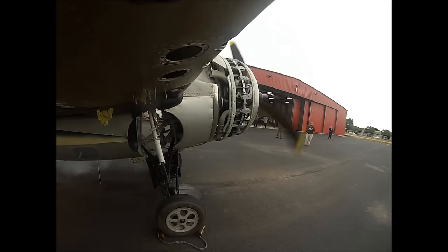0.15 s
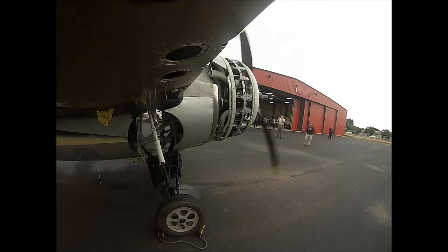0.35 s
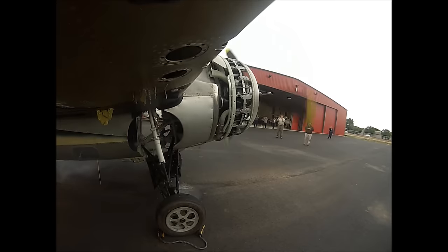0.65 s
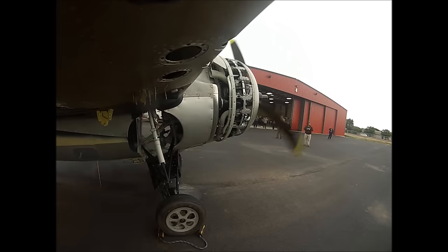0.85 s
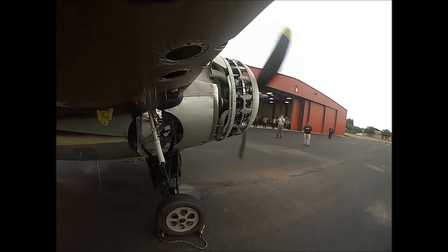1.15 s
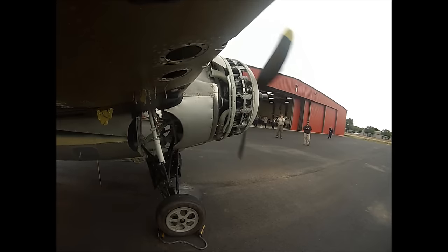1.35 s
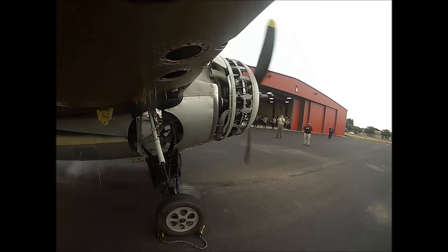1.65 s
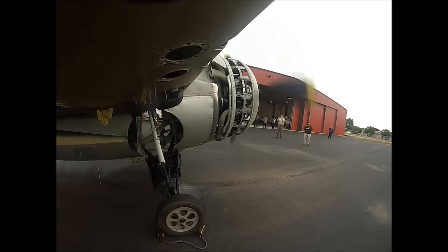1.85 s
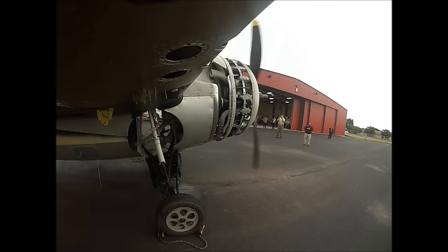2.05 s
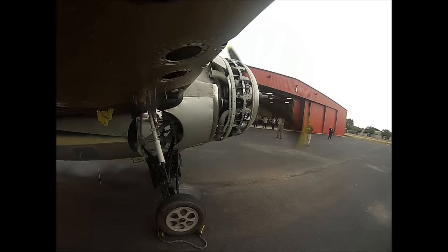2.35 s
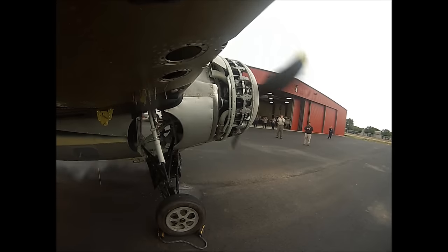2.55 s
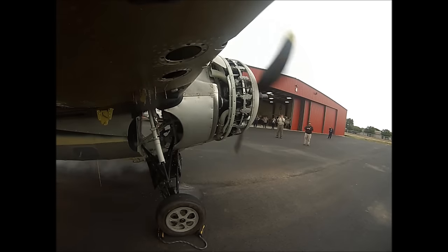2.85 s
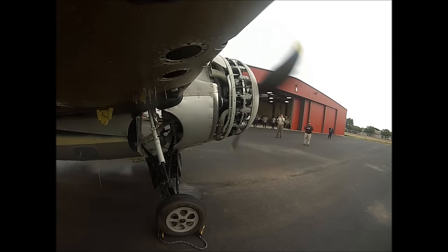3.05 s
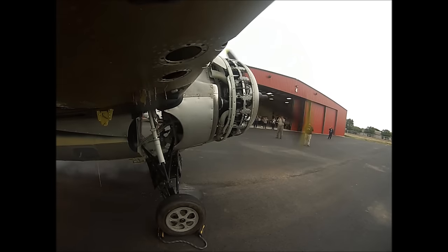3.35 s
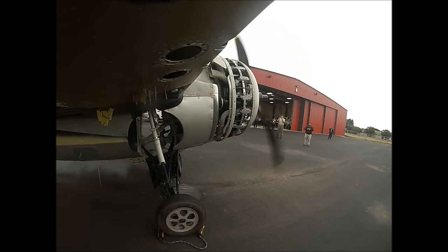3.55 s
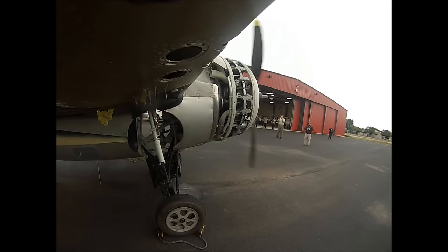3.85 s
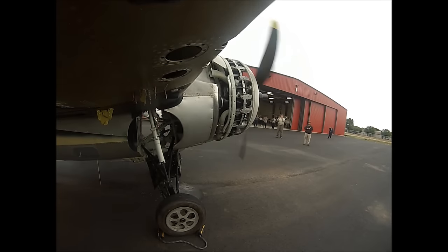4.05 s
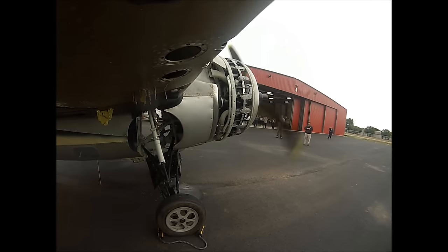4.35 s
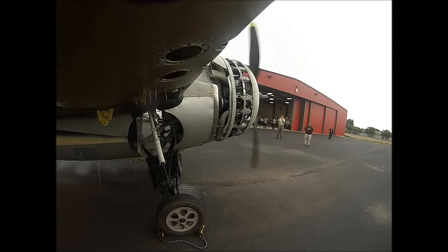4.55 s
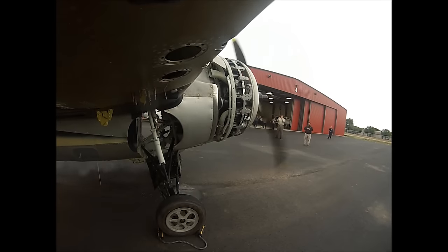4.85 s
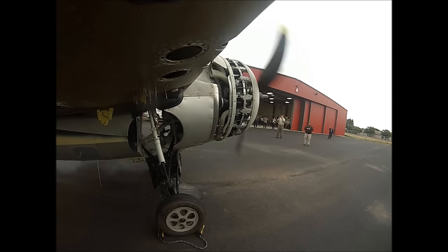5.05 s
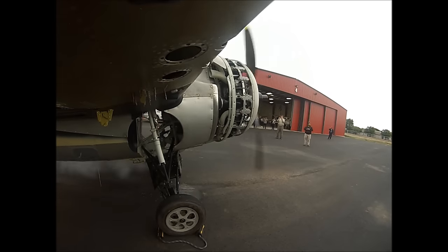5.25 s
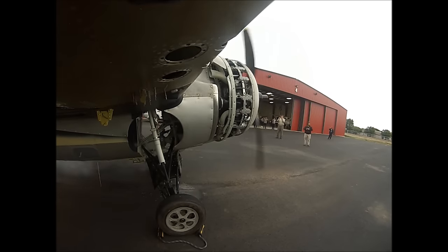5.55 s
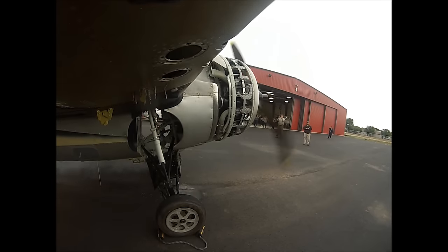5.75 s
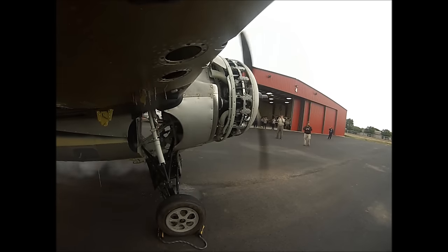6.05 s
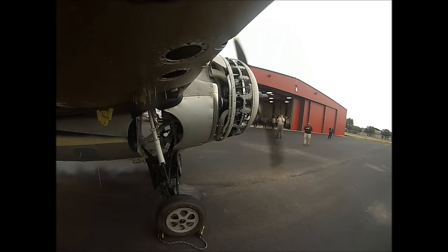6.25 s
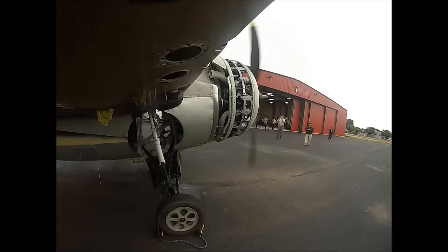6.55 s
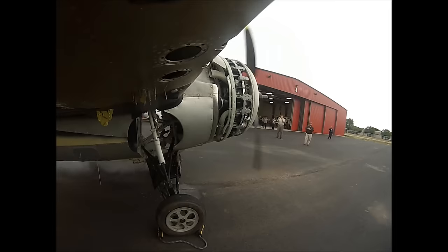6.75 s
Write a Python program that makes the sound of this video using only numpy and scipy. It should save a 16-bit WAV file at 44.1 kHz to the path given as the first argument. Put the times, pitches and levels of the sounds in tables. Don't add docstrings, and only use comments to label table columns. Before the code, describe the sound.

A large radial aircraft engine is already running roughly at 0 seconds, heard close under the wing on an open ramp through a small housed microphone. Uneven exhaust puffs come in a limping pattern, roughly twenty a second, each a short bright hiss or whistle followed by a hollow metallic ring; some knock dully. Hard cracks snap near 0.5 and 0.7, and misfires leave holes until about 1.4. Around 1.75 a crack and heavy suction bangs land together, and richer, louder popping with more metallic clatter follows through 2.6. More cracks and thumps hit near 3.0, 3.25, 4.2, 4.6 and 4.75. Afterward puffs weaken gradually but stay irregular, continuing to the cut near 6.9. Underneath run swelling panel booms, a wavering deep throb, valve ticking and low propeller rumble. Close, dry and open-air, without noticeable echo.

```python
import sys
import numpy as np
from scipy import signal
from scipy.fft import rfft, irfft
from scipy.io import wavfile
from scipy.ndimage import uniform_filter1d

SR = 44100
rng = np.random.default_rng(int(sys.argv[2]) if len(sys.argv) > 2 else 0)


def volts_from_db(level):
    exponent = np.asarray(level, float) / 20
    return 10 ** exponent


def unload_wav(signal):
    wavfile.write(
        sys.argv[1],
        SR,
        np.round(np.clip(np.atleast_2d(signal).T, -1, 1) * 32767).astype(np.int16),
    )


N = 303849


def rms_one(x):
    return x / np.sqrt(np.mean(x ** 2) + 1e-20)


def in_time(rows):
    s, values = np.transpose(rows)
    return np.interp(np.arange(N) / SR, s, values)


def band(x, low_hz, high_hz):
    return signal.sosfilt(signal.butter(2, [low_hz, high_hz], "band", fs=SR, output="sos"), x + 1e-18)


def coloured(spectrum, white):
    hz, db = np.transpose(spectrum)
    log_hz = np.log(np.arange(N // 2 + 1) * SR / N + 1)
    gain = volts_from_db(np.interp(log_hz, np.log(hz), db, -90, -90))
    return irfft(rfft(white) * rms_one(gain), N)


def resonate(x, modes, wander_db=0.):
    out = 0
    for k, (hz, width_hz, db) in enumerate(modes):
        r = np.exp(-np.pi * width_hz / SR)
        wander = np.interp(np.arange(N), np.linspace(0, N, 200), rng.standard_normal(200))
        drive = x * volts_from_db(wander_db * wander) + 1e-18
        ring = signal.lfilter([1, 0, -1], [1, -2 * r * np.cos(2 * np.pi * hz / SR), r * r], drive)
        out = out + (-1) ** k * volts_from_db(db) * (1 - r * r) / 2 * ring
    return out


def evened(x, span_s, share):
    x = rms_one(x)
    power = uniform_filter1d(x * x, int(span_s * SR))
    return x / (power + 0.036) ** (share / 2)


def turbulence(grit_db, cut_hz):
    lowpass = signal.butter(2, cut_hz, fs=SR, output="sos")
    flutter = rms_one(signal.sosfilt(lowpass, rng.standard_normal(N)))
    return rms_one(rng.standard_normal(N) * volts_from_db(grit_db * flutter))


def grains(per_s, spread_db):
    sizes = volts_from_db(spread_db * np.minimum(rng.exponential(1, N), 4))
    signs = rng.choice([-1, 1], N)
    return rms_one(sizes * signs * (rng.random(N) < per_s / SR))


CYCLE_STARTS_S = [-0.044, .2095, .457, 1.231, 1.755, 2.198, 2.413, 2.826, 3.025, 3.989, 4.365, 4.549,
                  4.7295, 4.909, 5.432, 6.104, 6.432, 6.93]
CYCLES_DONE = [0, 1, 2, 5, 7, 9, 10, 12, 13, 18, 20, 21, 22, 23, 26, 30, 32, 35]


def crank_angle(s):
    return np.interp(s, CYCLE_STARTS_S, CYCLES_DONE)


# place in the cycle 0-1, opening time in s, mouth in dB, whistle in dB, hum in dB.
STACKS = [
    (-.004, .005, -1, -2.5, -14.5),
    (.108, 0.0078, 0, -10.5, -14),
    (.372, .008, 2, -17, -1.5),
    (.545, 0.0057, -7, -5.5, -13.5),
    (.8, .009, -1, -2.5, -3),
]
# jet hiss in dB, upper housing ring in dB, lower housing ring in dB.
USUAL_PUFF = [
    (-29.5, -27, -23),
    (-30, -24, -22),
    (-44.5, -33, -34),
    (-33, -27, -26),
    (-57, -44, -40),
]
# time in s, then jet, upper ring and lower ring in dB.
SCATTER = [.0008, 1.2, 2.0, 2.5]
# time in s, strength in dB.
CHARGE = [(0, .5), (1.3, 1.1), (1.5, -3), (1.75, 3), (2.0, -2.2), (2.2, 1.1), (2.45, 2.5), (3.0, 1.1),
          (3.3, .1), (3.6, 1.5), (3.8, -1.1), (4.1, .4), (4.4, -3), (4.75, 1.1), (5.1, -3), (5.5, -2.5),
          (6.1, -5), (6.89, -6)]
# time in s, then gain of jet, upper ring and lower ring in dB.
RICH = [(.456, 2.5, 2.5, 1.5), (.485, .1, 2.5, 6), (.744, .1, 1.5, 3), (.809, 4, 2.5, 7),
        (.854, 2.5, -1.5, 2.5), (1.065, 3, 2.5, 6), (1.259, .1, -1.5, 3), (1.585, 4, 1.5, 9),
        (1.628, 1.5, 8, 4), (1.756, 2.5, 5, 2.5), (1.93, 5, 11, 11), (2.06, -1.5, 2.5, 8), (2.099, 4, 6, 9),
        (2.198, 2.5, 5, -3), (2.434, .6, -.6, 3), (2.623, .6, -.6, 3), (3.025, -1.5, 2.5, 5),
        (3.22, .1, -2.5, 4), (3.486, -.6, .6, 6), (3.605, .1, .1, 3), (3.624, 3, 1.5, 2.5),
        (4.093, -1.5, 1.5, 4), (4.386, -1.5, -4, 4), (4.649, 2.5, 1.5, 5), (5.001, 4, -.6, .6),
        (5.257, .6, -3, 5), (5.449, -3, -6, 3), (5.768, 4, -.6, -3), (5.936, -1.5, -3, 4),
        (6.192, 4, -.6, 6)]
# time in s, then loss of jet, upper ring and lower ring in dB.
LEAN = [(.094, 7, 5, 3), (.236, -.6, 2.5, 5), (.715, .6, 3, .6), (1.001, .6, 3, 4), (1.495, 1.5, 4, 7),
        (1.828, -1.5, -1.5, -1.5), (2.223, 4, -1.5, 6), (2.277, 2.5, -3, 6), (2.488, 1.5, 3, 10),
        (2.643, 5, -.6, 8), (2.899, -1.5, -2.5, 8), (3.045, -3, -1.5, 6), (3.131, 2.5, 2.5, 9),
        (3.295, 2.5, 2.5, 10), (3.415, 1.5, 4, .6), (3.436, 1.5, .6, 5), (3.515, 2.5, 5, 8),
        (3.682, -.6, 9, 14), (3.796, .1, -5, 18), (3.867, -1.5, -2.5, 8), (4.06, .6, -3, 9),
        (4.178, -.6, -3, 11), (4.433, -1.5, -4, 8), (4.464, 1.5, 7, 1.5), (4.549, .1, 3, 18),
        (4.825, 2.5, 5, 16), (5.274, 2.5, 4, 16), (5.62, 1.5, 1.5, 8), (6.433, 2.5, 14, 10),
        (6.615, -1.5, 7, 7)]
# time in s, loss in
# dB.
MISFIRES = [(-.015, 25), (.598, 25), (1.113, 25), (1.328, 14), (1.372, 16), (1.78, 25), (1.876, 22),
            (2.315, 22), (3.902, 22)]


def puffs():
    angle = (np.arange(CYCLES_DONE[-1])[:, None] + np.array(STACKS)[:, 0]).ravel()
    stack = np.arange(len(angle)) % len(STACKS)
    chance = rng.standard_normal((len(angle), 4)) * SCATTER
    s = np.interp(angle, CYCLES_DONE, CYCLE_STARTS_S) + chance[:, 0]
    charge_db = np.interp(s, *np.transpose(CHARGE))
    follows = [1, .8, .9]
    db = np.array(USUAL_PUFF)[stack] + charge_db[:, None] * follows + chance[:, 1:]
    for rows, sign in [(RICH, 1), (LEAN, -1), (MISFIRES, -1)]:
        for at, *change_db in rows:
            k = np.abs(s - at).argmin()
            s[k] = at
            db[k] += sign * np.array(change_db) - chance[k, 1:]
    return s, stack, *db.T


def blowdown(times, levels_db, rises, lag, fall, tail, tail_db):
    leak_db, leak_s = -17, .012
    power = np.zeros(N)
    for s, db, rise in zip(times, levels_db, rises):
        first, last = np.clip([int((s - .04) * SR), int((s + .13) * SR)], 0, N)
        t = np.arange(first, last) / SR - s - lag
        opening = np.exp(-(np.maximum(-t, 0) / rise) ** 2.7)
        leak = volts_from_db(2 * leak_db) * np.exp(2 * np.minimum(t, 0) / leak_s)
        after = np.maximum(t, 0)
        lingering = volts_from_db(2 * tail_db) * (1 - np.exp(-after / fall)) * np.exp(-after / tail)
        emptying = np.exp(-(after / fall) ** 2) + lingering
        power[first:last] += volts_from_db(2 * db) * np.maximum(opening, leak) * emptying
    return np.sqrt(power)


# frequency in Hz, level in dB per Hz.
JET = [(3500, -69), (4100, -4), (4500, -3), (5800, -4), (6350, -10), (6800, 0), (8600, -4.5), (9300, -8),
       (10200, -4.5), (12200, -11.5), (12700, -20), (15300, -15.5), (15600, -50)]


def jet_hiss(s, jet_db, rise):
    envelope = blowdown(s, 1.074 * jet_db - .5, rise, lag=0.00017, fall=0.0052, tail=0.0048, tail_db=-7)
    return coloured(JET, envelope * (turbulence(2.3, 360) + 0.55 * grains(1200, spread_db=4.5)))


# frequency in Hz, width in Hz, level in dB.
WHISTLE = [(5230, 304, 0)]


def stack_whistle(s, whistle_db, rise):
    envelope = blowdown(s, whistle_db, rise, lag=0.00033, fall=0.0085, tail=0.0073, tail_db=0)
    return volts_from_db(12) * resonate(envelope * turbulence(2.0, 300), WHISTLE, wander_db=3.5)


# frequency in Hz, width in Hz, level in dB.
PORT_HUM = [(6700, 450, 3.5), (7490, 860, -5.5), (8600, 450, -5.5), (4300, 230, -9)]


def port_hum(s, hum_db, rise):
    envelope = blowdown(s, hum_db, rise, lag=0.00086, fall=0.01, tail=0.0079, tail_db=-0.5)
    return volts_from_db(11.5) * resonate(envelope * turbulence(1.2, 300), PORT_HUM, wander_db=3.5)


# frequency in Hz, width in Hz, level in dB.
MOUTH = [(3320, 520, 2.5), (3700, 830, -25)]


def stack_mouth(s, mouth_db, rise):
    envelope = blowdown(s, mouth_db, 1.07 * rise, lag=0.0022, fall=0.01, tail=0.01, tail_db=-3)
    ring = resonate(envelope * turbulence(3.5, 580), MOUTH, wander_db=3.0)
    return volts_from_db(12) * band(ring, 2670, 6400)


# frequency in Hz, width in Hz, level in dB.
KNOCK = [(2410, 130, 0), (2560, 200, -7)]


def clamp_knock(s, upper_db, rise):
    envelope = blowdown(s, upper_db, rise, lag=0.004, fall=0.008, tail=0.01, tail_db=-4)
    return volts_from_db(19) * resonate(envelope * turbulence(2.5, 300), KNOCK, wander_db=2.5)


# frequency in Hz, width in Hz, level in dB.
SMALL_PANELS = [(330.5, 15, 5.5), (368.8, 27, 1.5), (421, 38, -2.5), (545.6, 83, -8), (682, 43, -4),
                (863, 127, -11.5)]


def panel_thud(lower):
    return volts_from_db(6.8) * resonate(lower * turbulence(1.1, 200), SMALL_PANELS, wander_db=3)


def housing(modes, low_hz, high_hz, envelope, cracks):
    drive = 0.74 * turbulence(2.8, 340) + grains(350, spread_db=4.5)
    rings = band(resonate(drive, modes, wander_db=3.5), low_hz, high_hz)
    crack_ring = band(resonate(cracks, modes), low_hz, high_hz)
    return envelope * evened(rings, span_s=0.018, share=0.82) + crack_ring


# frequency in Hz, width in Hz, level in dB.
UPPER_RING = [(2102, 210, -1.5), (2230, 134, 4.5), (2325, 128, 5.5), (2450, 234, 0), (2714, 750, -6.5)]
# frequency in Hz, width in Hz, level in dB.
LOWER_RING = [(1320, 34.6, 2), (1405.6, 48, 2), (1462, 68, 2.5), (1561, 77, -1), (1597, 58, -0.5)]
# time in s, peak in dB.
CRACKS = [(0.4868, -2), (0.7392, -4), (1.264, -18), (1.628, -21), (1.7588, -1), (2.0983, -16), (2.5333, -6),
          (2.6205, -22), (3.03, -6), (3.7983, -13), (4.1824, -2), (4.576, -2)]


def exhaust():
    s, stack, jet_db, upper_db, lower_db = puffs()
    _, rise, mouth_db, whistle_db, hum_db = np.array(STACKS)[stack].T
    mouth_db = mouth_db + 0.26 * jet_db + 0.43 * upper_db + 0.4 * lower_db - 7.5
    upper = blowdown(s, upper_db, 1.43 * rise, lag=0.0051, fall=0.0059, tail=0.013, tail_db=-5)
    lower = blowdown(s, lower_db, 1.92 * rise, lag=0.0078, fall=0.0074, tail=0.014, tail_db=-2.5)
    third = stack == 2
    cracks = np.zeros(N)
    for at, db in CRACKS:
        cracks[round(at * SR)] = volts_from_db(db)
    out = jet_hiss(s, jet_db, rise)
    out = out + stack_whistle(s, jet_db + whistle_db, rise)
    out = out + port_hum(s, jet_db + hum_db, rise)
    out = out + stack_mouth(s, mouth_db, rise)
    out = out + clamp_knock(s[third], upper_db[third], rise[third])
    out = out + panel_thud(lower)
    out = out + volts_from_db(-2.5) * housing(UPPER_RING, 1270, 2740, upper, volts_from_db(16) * cracks)
    return out + volts_from_db(-2.5) * housing(LOWER_RING, 1100, 1735, lower, volts_from_db(28) * cracks)


def firings(angle, spread_db):
    cylinders, jitter_s = 14, .0015
    at = np.flatnonzero(np.diff(np.floor(angle * cylinders)) > 0)
    draws = rng.standard_normal((len(at), 3))
    at = np.clip(at + (draws[:, 2] * jitter_s * SR).astype(int), 0, N - 1)
    kicks = np.zeros(N)
    kicks[at] = volts_from_db(spread_db * draws[:, 0]) * np.sign(draws[:, 1])
    return rms_one(kicks)


# level at the start in dB, fade in dB per s.
SHAKE_LEVELS = [
    (-27, .4),
    (-27, .5),
    (-28, .6),
]
# time in s, rise in dB.
SPAR_BOOMS = [(0, 5), (.45, 3), (.85, -7), (1.4, 9), (1.87, 7), (2.45, 3), (2.89, 8), (3.74, 5), (4.1, 10),
              (4.76, 11), (5.1, 8), (5.61, 7), (6.12, 4), (6.63, 4)]
# time in s, rise in dB.
SKIN_BOOMS = [(0, 3), (.51, 10), (.95, 7), (1.33, 6), (1.87, 8), (2.06, 7), (2.6, 9), (3.2, 6), (4.12, 7),
              (4.38, 6), (4.76, 4), (5.1, 5), (5.95, 7), (6.63, 5)]
# time in s, rise in dB.
COWL_BOOMS = [(0, 9), (.34, 6), (1.19, 3), (1.95, 6), (2.38, 7), (2.56, 7), (2.89, 5), (3.3, 5), (3.55, 5),
              (3.91, 4), (4.9, 6), (5.63, 5), (5.93, 4)]


def shaking():
    boom_s = .12
    t = np.arange(0, N, 64) / SR
    levels_db = []
    for (db, fade), booms in zip(SHAKE_LEVELS, [SPAR_BOOMS, SKIN_BOOMS, COWL_BOOMS]):
        swell_db = sum(rise_db * np.exp(-((t - s) / boom_s) ** 2) for s, rise_db in booms)
        levels_db.append(np.interp(np.arange(N) / SR, t, db - fade * t + swell_db))
    return levels_db


# frequency in Hz, width in Hz, level in dB.
SPAR = [(89.8, 4.5, 4), (102.3, 33, -13.5), (123.7, 7.9, -4.5)]
# frequency in Hz, width in Hz, level in dB.
SKIN = [(150.5, 6.9, -11.5), (170.4, 4.67, -1.5), (185.6, 9.3, -10), (202.3, 21.4, -18.5)]
# frequency in Hz, width in Hz, level in dB.
COWL = [(252.6, 11.4, -8.5), (272, 6.7, 1), (280.9, 5.5, -4), (301, 4.2, -5)]


def airframe(angle):
    kicks, out = firings(angle, spread_db=5), 0
    for modes, level_db in zip([SPAR, SKIN, COWL], shaking()):
        drive = kicks + .5 * rng.standard_normal(N)
        boom = band(resonate(drive, modes), 0.86 * modes[0][0], 1.203 * modes[-1][0])
        out = out + volts_from_db(level_db) * evened(boom, span_s=0.17, share=0.68)
    drive = kicks + 2.0 * rng.standard_normal(N)
    rattle = rms_one(band(resonate(drive, SMALL_PANELS, wander_db=3), 341, 1220))
    return out + volts_from_db(0.76 * in_time(CLATTER) - 13.5) * rattle


THROB_ORDERS = [4, 5, 6, 7]
THROB_LAG_RAD = [-0.28, 3, 4, 0.05]
THROB_DB = [-17.5, -22.5, -22, -20.5]
# frequency in Hz, gain in dB.
MOUNT = [(14, -6), (17, -7), (19.8, -10), (21.3, -1.5), (24, .6), (28, -.1), (29.6, -12), (32, -22)]
# order of the cycle, level in dB.
STEADY_ORDERS = [(2, -37), (3, -33.5), (9, -50), (11, -44)]


def throb(angle):
    lope_db, settled_db, settle_s = 3.5, .8, 4.6
    turn, t = 2 * np.pi * angle, np.arange(N) / SR
    cycles_per_s = uniform_filter1d(np.gradient(angle) * SR, SR // 4)
    waver_db = np.where(t < settle_s, lope_db, settled_db)
    hz, mount_db = np.transpose(MOUNT)
    cycles = np.arange(CYCLES_DONE[-1] + 1)
    out = 0
    for k, lag, db in zip(THROB_ORDERS, THROB_LAG_RAD, THROB_DB):
        chance = np.interp(angle, cycles, rng.standard_normal(len(cycles)))
        passed_db = np.interp(np.log(k * cycles_per_s), np.log(hz), mount_db)
        level_db = db + passed_db + uniform_filter1d(waver_db * chance, SR // 20)
        out = out + volts_from_db(level_db) * np.cos(k * turn + lag)
    for k, db in STEADY_ORDERS:
        out = out + volts_from_db(db) * np.cos(round(k) * turn)
    return np.sqrt(2) * out


# time in s, level in dB.
CLATTER = [(0.0, -43.5), (0.4, -33), (0.55, -39.5), (1.32, -42.5), (1.76, -32.5), (3.8, -39), (4.22, -37),
           (6.89, -40.5)]


def clatter(angle):
    drive = 0.56 * firings(angle, spread_db=-3) + 0.83 * turbulence(2.3, 180) + 0.52 * grains(250, spread_db=4)
    lower = rms_one(band(resonate(drive, LOWER_RING, wander_db=2.5), 1227, 2300))
    upper = rms_one(band(resonate(drive, UPPER_RING, wander_db=3.5), 1880, 2170))
    hiss = rms_one(resonate(drive, PORT_HUM + WHISTLE + MOUTH))
    return volts_from_db(in_time(CLATTER)) * (lower + volts_from_db(-10.5) * upper + volts_from_db(-19.5) * hiss)


# frequency in Hz, level in dB per Hz.
WASH = [(12, -7), (25, 4), (45, -9.5), (70, -7), (300, -15), (500, -49.5), (1100, -37), (3000, -45),
        (7000, -57.5), (9000, -60), (15000, -71.5)]


def propeller_wash():
    return volts_from_db(-26) * coloured(WASH, rng.standard_normal(N))


# time in s, peak in dB.
BANGS = [(1.762, -12), (1.776, -6.5), (3.05, -6), (3.247, -8), (4.768, -7.5)]


def bangs():
    t = np.arange(N) / SR
    return sum(-volts_from_db(db) * np.exp(-((t - s) / .0011) ** 2) for s, db in BANGS)


def scene():
    angle = crank_angle(np.arange(N) / SR)
    return (exhaust() + airframe(angle) + throb(angle) + clatter(angle) + propeller_wash() + bangs())[None]


def roll_off(x):
    return signal.sosfilt(signal.butter(12, 15540, fs=SR, output="sos"), x)


def record(dry):
    cut = signal.sosfilt(signal.cheby2(12, 50, 15600, fs=SR, output="sos"), dry)
    mix = 2.508 * np.tanh(cut / 2.477)
    return roll_off(mix)


dry = scene()
out = record(dry)
unload_wav(out)
```